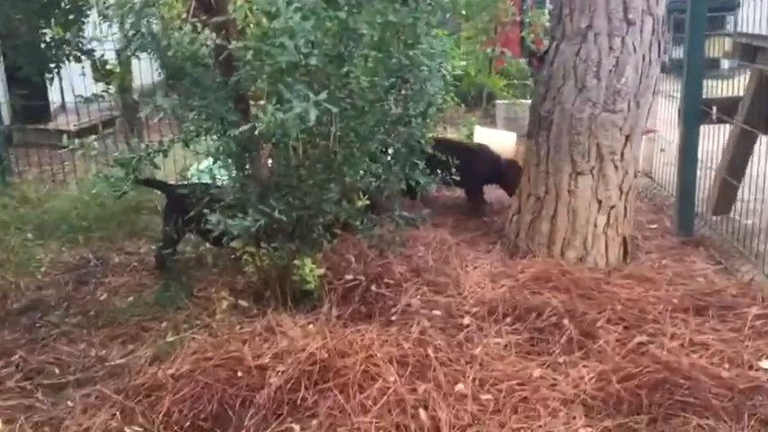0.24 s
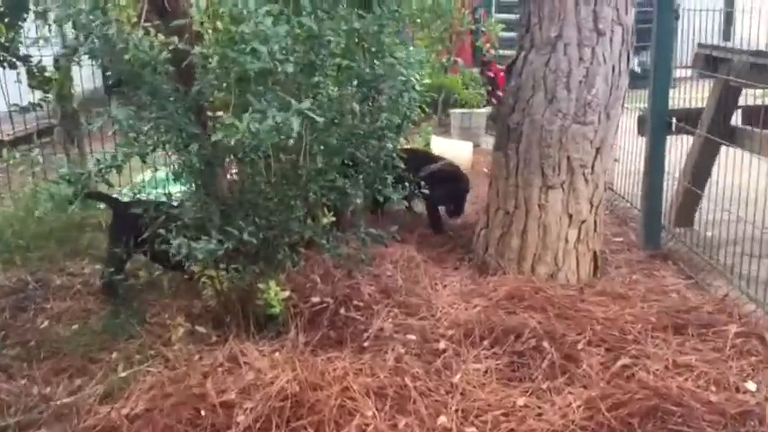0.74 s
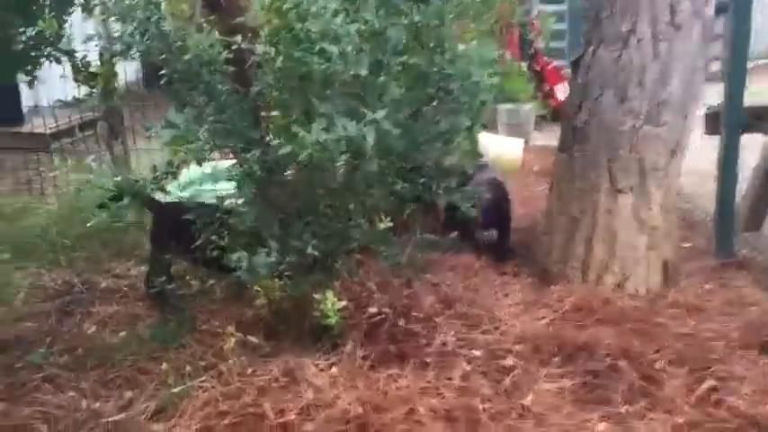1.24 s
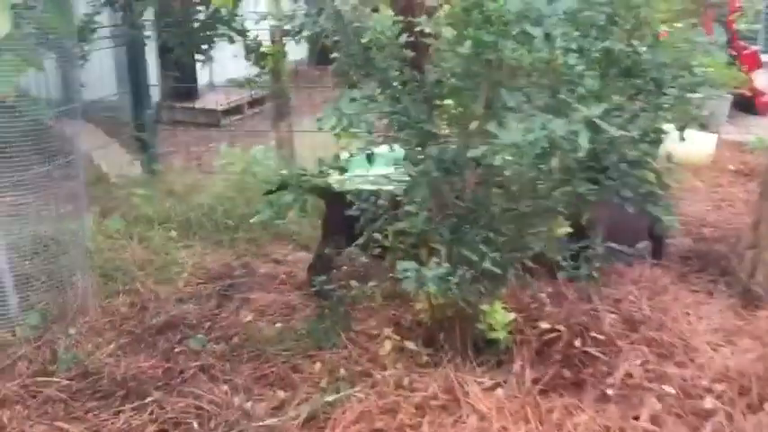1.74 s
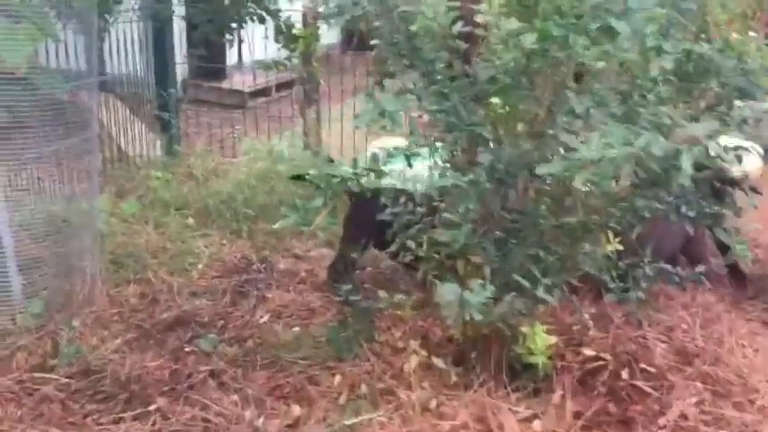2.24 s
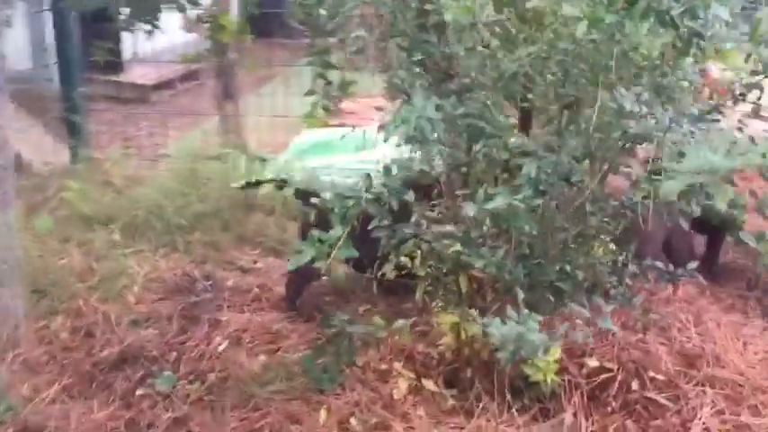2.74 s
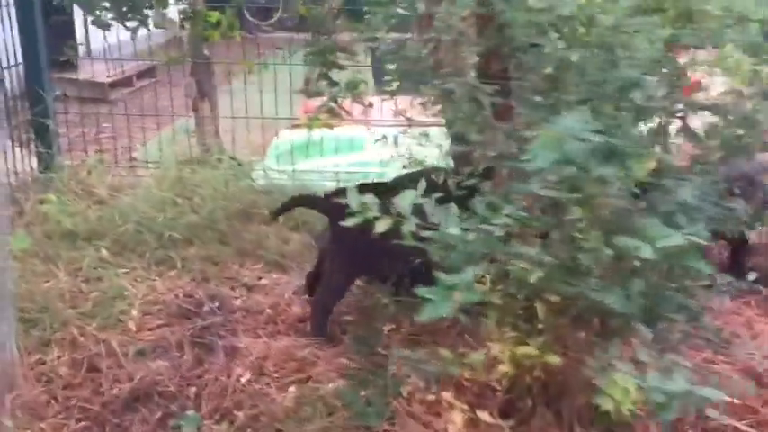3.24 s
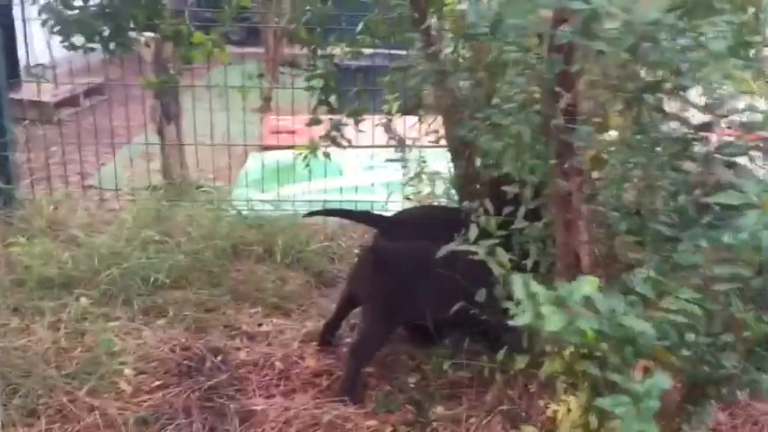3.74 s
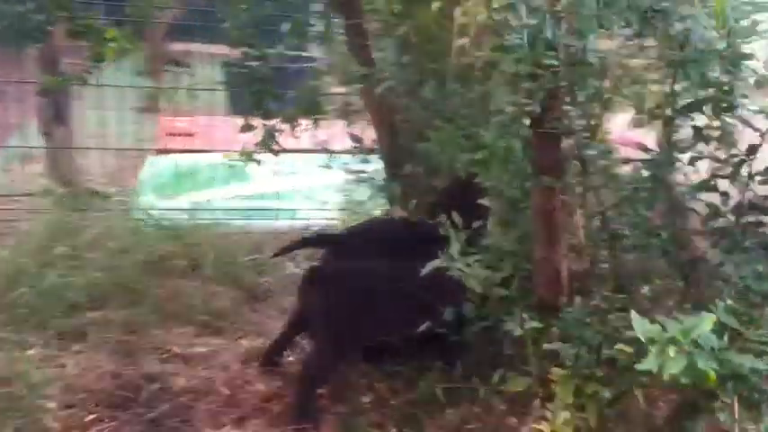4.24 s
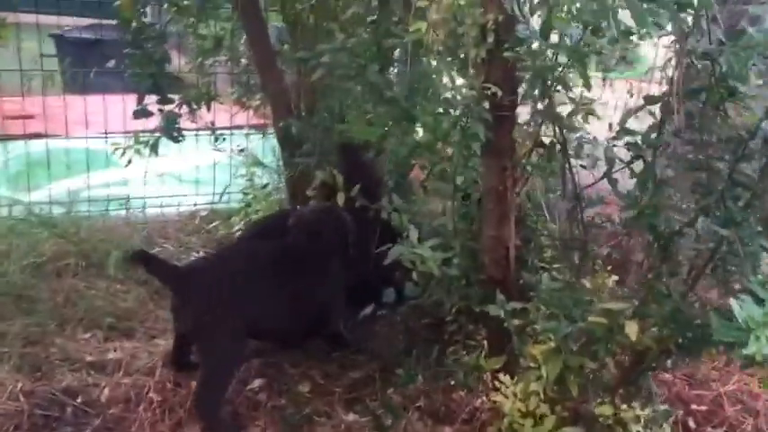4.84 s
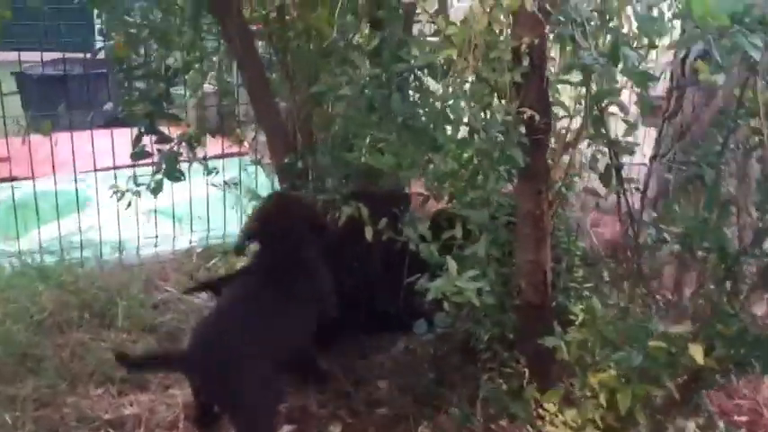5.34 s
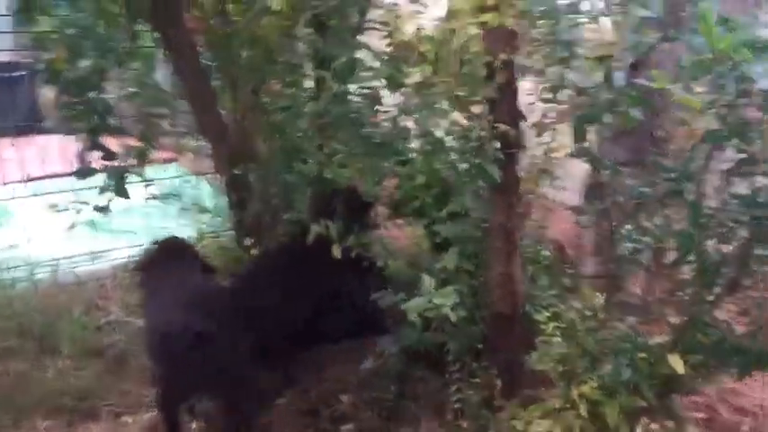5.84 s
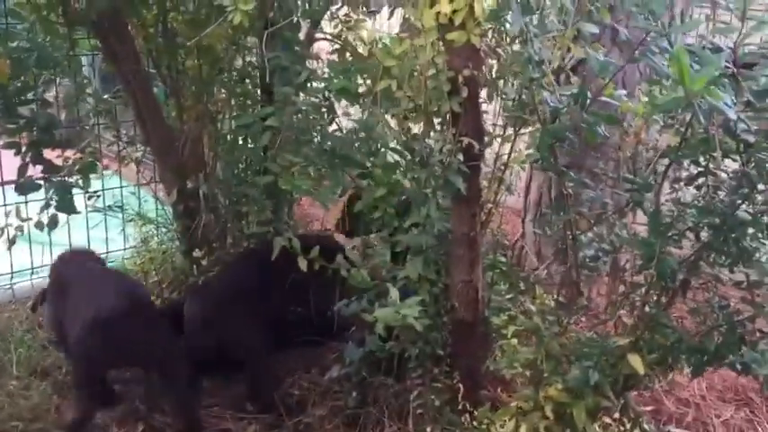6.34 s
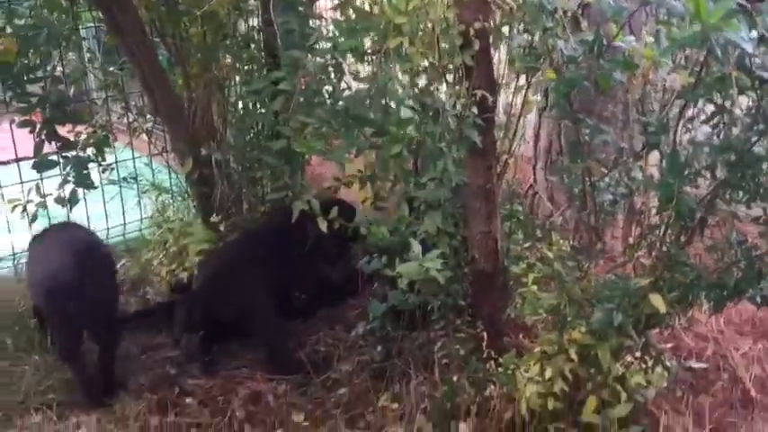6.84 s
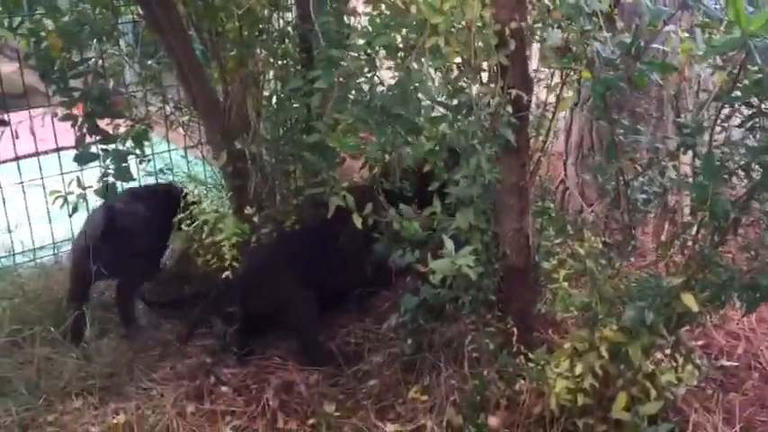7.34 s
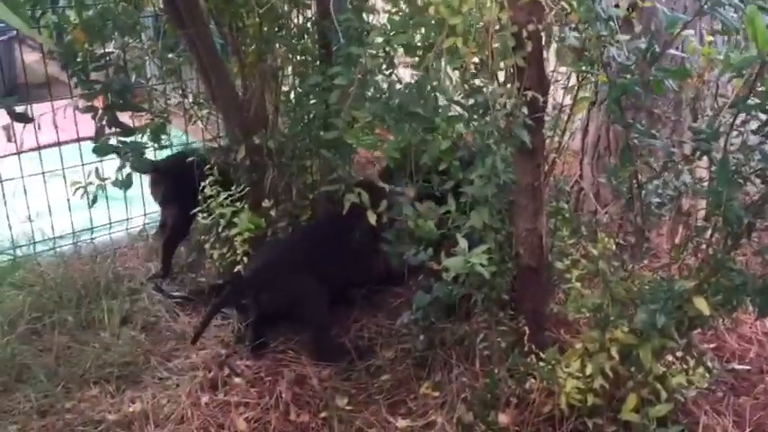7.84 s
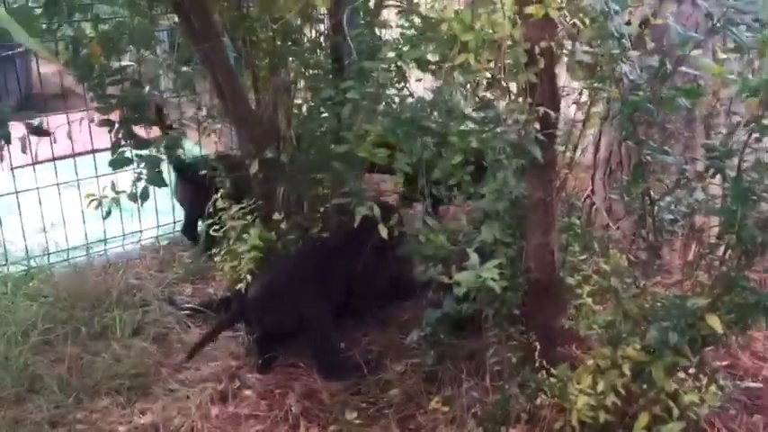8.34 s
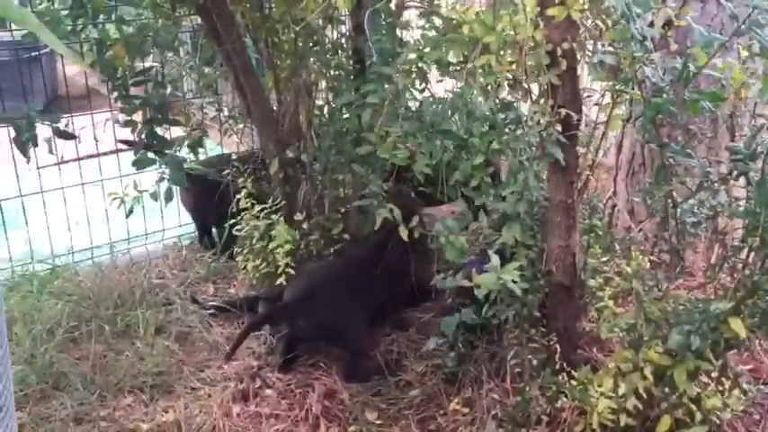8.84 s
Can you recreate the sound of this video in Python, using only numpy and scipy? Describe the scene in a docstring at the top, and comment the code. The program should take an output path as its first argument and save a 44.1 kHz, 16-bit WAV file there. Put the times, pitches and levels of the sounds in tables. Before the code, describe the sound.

Quiet outdoor air with a faint low breeze, heard through a handheld microphone a few metres from puppies scuffling under a shrub. At 0.3 s comes one loud, sharp, high yelp with nasal squeaks, cracking downward and echoing dully. Tiny whimpers and squeaks follow until 1.9 s, the last, around 1.8 s, mixed with a quick leaf rustle. At 2.5 s a sharp needle scuff and knock; near 3 s a very faint hum-like growl. Scuffs, woody taps and small huffs cluster around 3.4-3.9 s. A thin high squeak sounds at 4.5 s, then a burst of hard knocks at 5.1 s and more scuffing to 6 s. Short rough growls come at 6.4-7.1 s and 7.3-7.9 s, amid swelling leaf rustle and low foot thumps. A crisp leaf snap at 8.17 s and a dull knock at 8.25 s lead to quieter stirring until 9 s.

```python
"""Puppies play-fight under a garden shrub, a few metres from a hand-held camera's microphone, in quiet air.
At once one whimpers, squeaks through its nose and yelps: wavering near-pure tones; dull echoes answer.
Bumps, knocks and huffs follow: short decaying tones, struck noise, puffs through muzzle resonances.
From about three seconds come short growls: uneven pulses and breath through moving resonances.
All along, needles scuff and leaves shake as coloured noise; dry leaves snap, and late on one knock thuds."""
import sys
import numpy as np
from scipy import signal
from scipy.fft import rfft, irfft
from scipy.io import wavfile
from scipy.ndimage import uniform_filter1d

SR = 44100
rng = np.random.default_rng(int(sys.argv[2]) if len(sys.argv) > 2 else 0)


def wav_record(signal):
    """Record a signal, one row per channel, as 16-bit PCM in the file named by sys.argv[1]."""
    frames = np.transpose(np.atleast_2d(signal))
    bounded = np.clip(frames, -1, 1)
    # unit amplitude maps onto the largest positive 16-bit level
    quanta = np.round(bounded * 32767).astype(np.int16)
    wavfile.write(sys.argv[1], SR, quanta)


N = 400560  # length in samples


def amp(db):
    """Decibels to gain."""
    return 10 ** (np.asarray(db) / 20)


def unit(x):
    """Scales to an rms of one."""
    return x / np.sqrt(np.mean(x ** 2) + 1e-20)


def read(points, hz):
    """Reads a spectrum on a log-frequency axis."""
    point_hz, value = np.transpose(points)
    return np.interp(np.log(hz + 1), np.log(point_hz + 1), value)


def over_time(points):
    """Reads a curve of (time, value) at every sample of the scene."""
    return np.interp(np.arange(N) / SR, *np.transpose(points))


def follow(rows):
    """Start time and the columns of a curve, sample by sample."""
    s, *columns = np.transpose(rows)
    t = np.arange(s[0], s[-1], 1 / SR)
    return s[0], [np.interp(t, s, column) for column in columns]


def add(mix, s, sound):
    """Lays a sound into the mix at time s."""
    part = mix[max(round(s * SR), 0):][:len(sound)]
    part += sound[:len(part)]


def fade(x, size=130):
    """Softens both ends over a number of samples."""
    i = np.arange(len(x))
    return x * np.minimum(np.minimum(i, i[::-1]) / size, 1)


def drift(count, hz):
    """Smooth random wandering, about one in rms, that moves up to some hz times a second."""
    f = np.fft.rfftfreq(count + SR, 1 / SR)
    slow = rfft(rng.standard_normal(count + SR)) * np.exp(-(f / hz) ** 2)
    return unit(irfft(slow))[:count]


def colour(x, spectrum):
    """Gives a sound a spectrum and an rms of one."""
    gain = amp(read(spectrum, np.fft.rfftfreq(len(x), 1 / SR)))
    return unit(irfft(rfft(x) * gain, len(x)))


def resonate(x, hz, width):
    """A resonance of gain one at its peak."""
    return signal.lfilter(*signal.iirpeak(hz, hz / width, SR), x)


def throat(x, modes):
    """Steep resonances, each passed twice, with dark valleys between them."""
    return sum(amp(db) * resonate(resonate(x, hz, width), hz, width) for hz, width, db in modes)


def moving(x, modes, shift):
    """Steep resonances that all glide by the factor shift."""
    out = 0
    for hz, width, db in modes:
        # bring the resonance down to zero Hz, smooth there, and turn it back up
        turn = np.exp(2j * np.pi * np.cumsum(hz * shift) / SR)
        r = np.exp(-np.pi * width / SR)
        smooth = signal.lfilter([(1 - r) ** 2], np.poly([r, r]), x / turn)
        out = out + amp(db) * 2 * (turn * smooth).real
    return out


def crackle(per_s, spread_db, hiss):
    """Countless tiny clicks of uneven size over a smooth hiss."""
    sizes = amp(spread_db * np.minimum(rng.exponential(1, N), 4)) * rng.standard_normal(N)
    clicks = unit(sizes * (rng.random(N) < per_s / SR))
    return clicks + hiss * rng.standard_normal(N)


def mottle(x, depth_db):
    """Every contact has its own pitch: short patches of the spectrum stand out or sink."""
    z = signal.stft(x, nperseg=512, noverlap=384)[2]
    patches = uniform_filter1d(rng.standard_normal(z.shape), size=4, axis=0)
    patches = unit(uniform_filter1d(patches, size=7, axis=1))
    return signal.istft(z * unit(amp(depth_db * patches)), nperseg=512, noverlap=384)[1][:len(x)]


def swells(rows, range_db=18.5):
    """Gain of overlapping movements that change by range_db over their rise or fall time."""
    t, power = np.arange(0, N, 32) / SR, 0
    for s, db, rise_s, fall_s in rows:
        away = np.maximum((s - t) / rise_s, (t - s) / fall_s)
        power = power + amp(db - range_db * away) ** 2
    return np.interp(np.arange(N) / SR, t, np.sqrt(power))


def arch(length, db, pitches, ends_db, crest):
    """Pitch and level of a short call: one smooth bend through three pitches, one swell.

    Its ends lie ends_db under its crest, which comes at the share crest of its length."""
    u = np.linspace(0, 1, int(length * SR))
    from_crest = np.interp(u, [0, crest, 1], [-1, 0, 1])
    return np.polyval(np.polyfit([0, .5, 1], pitches, 2), u), db - ends_db * from_crest ** 2


def whine(hz, db, tone, jitter, shimmer_db, full_db=-20, purity=.3):
    """A nearly pure call that trembles a little; overtones grow with effort."""
    slack = np.clip((full_db - db) / 20, .2, 1.5)  # soft calls are less steady
    trembling_hz = hz * (1 + slack * jitter * drift(len(hz), 300))
    angle = 2 * np.pi * np.cumsum(trembling_hz) / SR
    overtones = sum(amp(part_db) * np.sin(round(k) * angle) for k, part_db in tone[1:])
    wave = amp(tone[0][1]) * np.sin(angle) + overtones * amp(purity * (db - full_db))
    return fade(np.sqrt(2) * wave * amp(db + slack * shimmer_db * drift(len(hz), 90)))


def air(wash_db=-64, breeze_db=-70, gust_db=2.5):
    """Quiet outdoor wash and a lumpy breeze on the microphone: coloured noise that swells together."""
    # spectrum of the wash: freq_hz, relative level_db
    wash_spectrum = [(18, -28.5), (30, -5.5), (59, 8), (85, 5.5), (182, -7), (341, -14), (1510, -11),
                     (1910, -13.5), (4310, -17), (4910, -20), (6050, -18.5), (11300, -28), (15500, -23)]
    # slow swells of the whole: time_s, gain_db
    wash_swell = [(0, -2), (.5, 0.5), (0.798, 2.5), (2.4, 0), (4.2, 1.5), (6.2, -1), (9.08, 0.5)]
    wash = colour(rng.standard_normal(N), wash_spectrum) * amp(wash_db + 1.2 * drift(N, 6))
    breeze = unit(throat(rng.standard_normal(N), [(71, 310, -2.5), (135, 89, -8)]))
    outdoors = wash + breeze * amp(breeze_db + gust_db * drift(N, 13.7))
    return outdoors * amp(over_time(wash_swell))


def leaves(gain_db=-1, clump_db=2.0, tick_db=-9):
    """Leaves brush each other as the shrub shakes, with a sprinkle of drier ticks."""
    # pushes that shake the shrub: peak_time_s, level_db before gain_db, rise_s, fall_s
    pushes = [(.98, -64.5, .12, 0.11), (1.19, -60, .15, .1), (1.39, -61.5, .1, .25),
              (1.76, -54.5, 0.14, 0.16), (1.83, -48.5, 0.032, 0.033), (3.44, -50.5, 0.064, 0.097),
              (4.32, -53, 0.13, 0.087), (4.97, -55.5, 0.071, 0.11), (5.39, -61, 0.45, 0.084),
              (6.03, -52, 0.33, .09), (6.43, -55.5, 0.13, 0.082), (6.67, -55, 0.13, 0.2),
              (7.27, -47.5, 0.12, 0.061), (7.58, -51, 0.27, 0.24), (7.73, -53.5, 0.082, .2),
              (8.11, -50, 0.16, 0.12), (8.172, -46, 0.036, 0.092), (8.98, -61, 0.21, 0.31)]
    # leaves stirring between pushes: time_s, level_db before gain_db
    stirring = [(0, -75.5), (2.5, -72.5), (4.6, -65), (6.5, -68.5), (9.08, -67.5)]
    # spectrum of the leaves: freq_hz, relative level_db
    leaf_spectrum = [(880, -24.5), (1500, -15.5), (2440, -6), (3280, -5), (4390, -3), (5040, -5),
                     (8710, -1), (10500, -4.5), (11700, -1.5), (15500, -8)]
    shake = np.hypot(swells(pushes), amp(over_time(stirring)))
    brush = rng.standard_normal(N) * amp(clump_db * drift(N, 36))
    ticks = amp(tick_db) * crackle(per_s=200, spread_db=3, hiss=0)
    return amp(gain_db) * shake * colour(brush + ticks, leaf_spectrum)


def scuffs(clump_db=0.5, shuffle_db=-69, restless_db=4):
    """Paws drag through needles: clumps of small clicks under each stroke, over a restless shuffle."""
    # paw strokes through the pine needles: peak_time_s, peak_db, rise_s, fall_s
    strokes = [(2.536, -42, 0.031, 0.054), (3.42, -56, .03, .15), (3.535, -53.5, 0.18, 0.02),
               (3.77, -60.5, .03, 0.025), (3.91, -67, 0.071, 0.0088), (4.37, -60.5, 0.23, 0.033),
               (5.092, -48.5, 0.094, .095), (5.49, -63, .08, 0.017), (5.66, -62, 0.14, 0.41),
               (5.862, -55, 0.055, .03), (5.955, -50.5, 0.053, 0.09)]
    # spectrum of the needles: freq_hz, relative level_db
    needle_spectrum = [(120, -25.5), (200, -1.5), (467, -6.5), (647, -4), (761, -8), (896, -1.5),
                       (1540, -7), (3010, -12.5), (3800, -10.5), (4810, -20), (5760, -12.5), (15000, -40.5)]
    # the small steps grow audible as the camera comes nearer, then sink again
    nearness = np.interp(np.arange(N) / SR, [0, 3.5, 8, 9], [0.34, 1, 0.51, 0.15])
    shuffle = nearness * amp(shuffle_db + restless_db * drift(N, 3.9))
    grains = crackle(per_s=1600, spread_db=3, hiss=.4) * amp(clump_db * drift(N, 70))
    return (swells(strokes) + shuffle) * colour(grains, needle_spectrum)


def cries():
    """The yelp, the whimpers, and the cracks in which the voice drops to a lower register, with leaking air."""
    # the one loud yelp: time_s, pitch_hz, level_db
    yelp = [(.325, 1380, -46), (.330, 1475, -21.5), (.336, 1500, -19), (.352, 1518, -19.3),
            (.359, 1555, -21.5), (.369, 1562, -19.7), (.385, 1540, -35)]
    # soft whimpers: start_s, length_s, peak_db, first_hz, middle_hz, last_hz
    whimpers = [(.283, .021, -33, 1328, 1346, 1400), (0.593, 0.029, -58.5, 740, 712, 700),
                (1.035, 0.069, -56.5, 632, 654, 710), (1.304, 0.041, -50, 1375, 1432, 1410),
                (1.387, 0.077, -58.5, 755, 780, 664), (1.715, 0.096, -50.5, 970, 1072, 1070),
                (1.801, 0.096, -44.5, 1103, 1177, 1030)]
    # a strained cry cracks into a lower register: start_s, peak_db, pitch_hz that it sinks towards
    cracks = [(0.386, -38.5, 997), (1.792, -48.5, 607), (1.884, -49.5, 795)]
    # voice at full effort: harmonic number, level_db
    cry_tone = [(1, -0.5), (2, -25.5), (3, -33.5), (4, -26.5), (5, -54)]
    # air that escapes with a cry: freq_hz, width_hz of each pass, level_db against the voice
    escaping_air = [(3600, 1500, -42), (5600, 780, -40.5)]
    crack_s, crack_fade_db = 0.034, 14.5
    out, t = np.zeros(N), np.arange(0, crack_s, 1 / SR)
    calls = [follow(yelp)]
    for s, length, peak_db, *pitches in whimpers:
        calls.append((s, arch(length, peak_db, pitches, ends_db=9.5, crest=0.61)))
    for s, peak_db, low_hz in cracks:
        sinking_hz = low_hz * (1 + 0.59 * np.exp(-t / 0.0049))  # starts higher by this share
        calls.append((s, (sinking_hz, peak_db - crack_fade_db * t / crack_s)))
    for s, (hz, db) in calls:
        rush = rng.standard_normal(len(hz))
        leak = sum(amp(air_db) * unit(throat(rush, [(air_hz, width, 0)]))
                   for air_hz, width, air_db in escaping_air)
        voice = whine(hz, db, cry_tone, jitter=0.012, shimmer_db=1.9)
        add(out, s, voice + fade(leak * amp(db)))
    return out


def squeaks():
    """High whistles through the nose, each with some of its octave."""
    # squeaks: start_s, length_s, peak_db, first_hz, middle_hz, last_hz, octave_db at full effort
    squeak_rows = [(.306, 0.034, -48.5, 5360, 5280, 5650, -2.5),
                   (0.382, 0.024, -50.5, 5820, 5810, 5850, -7.5),
                   (0.629, 0.075, -49.5, 6520, 5640, 5400, 2.5), (1.205, 0.039, -62, 4800, 4825, 4860, -12),
                   (1.305, 0.033, -61, 5600, 5580, 5700, -18), (1.342, 0.028, -52.5, 6020, 5860, 5900, -6),
                   (1.352, 0.1, -59.5, 5660, 6000, 7250, -12), (4.453, 0.042, -56, 4900, 4960, 5170, -20),
                   (4.492, 0.079, -43.5, 5130, 5250, 5150, -18)]
    out = np.zeros(N)
    for s, length, peak_db, *pitches, octave_db in squeak_rows:
        hz, db = arch(length, peak_db, pitches, ends_db=10, crest=0.59)
        add(out, s, whine(hz, db, [(1, 0), (2, octave_db)], jitter=0.0014, shimmer_db=1.46))
    return out


def bumps(gain_db=1):
    """Soft ground gives way for a few cycles under a foot: a low tone that swells and dies."""
    # feet on the ground: start_s, level_db before gain_db, pitch_hz, swell_s
    bump_rows = [(0.659, -46, 54, 0.0083), (0.857, -50.5, 127, 0.006), (2.54, -60, 97.8, 0.0086),
                 (3.417, -47.5, 87, .007), (3.877, -52, 126, 0.0097), (5.089, -42.5, 302, 0.0026),
                 (5.565, -48.5, 106.6, 0.0061), (7.504, -34.5, 70.3, 0.005), (7.652, -41, 84.6, 0.013),
                 (7.762, -38, 111, 0.01), (7.806, -36.5, 73, 0.016), (8.029, -35.5, 62.4, 0.014),
                 (8.25, -42, 126, 0.0047), (8.737, -42.5, 58.4, 0.0054)]
    out, t = np.zeros(N), np.arange(9000) / SR
    for s, db, hz, swell_s in bump_rows:
        swell = t / swell_s * np.exp(1 - t / swell_s)
        add(out, s, amp(gain_db + db) * np.sin(2 * np.pi * hz * t) * swell)
    return out


def knocks(gain_db=-3, ring_db=2, clatter_db=-4, crack_db=-1,
           ring_s=0.0048, crack_s=0.002, clatter_s=0.005, thud_s=0.0089):
    """A blow cracks, rings the wood briefly, rattles the litter and pushes the ground."""
    # paws and bodies on stems and twigs: start_s, level_db before gain_db, ring_hz,
    # extra crack_db, thud_db
    blows = [(0.761, -43, 1860, -14, -1), (1.117, -43, 2100, -21, -21), (2.534, -36, 2045, -23, 5.5),
             (2.542, -38, 1570, -19, 0), (2.594, -38, 1400, -32, 0), (2.717, -55.5, 346, 5, 16),
             (2.765, -44, 494, -3, 3), (3.067, -49.5, 1220, -14, 4), (3.396, -41.5, 1500, -17, -7),
             (3.489, -39, 1550, -3, -3), (3.52, -43, 1460, -16, 2.5), (3.532, -39.5, 1160, 3, -13),
             (3.644, -46, 307, -9, -5), (5.082, -38, 2040, 8, -30), (5.085, -31, 1183, -3, -14),
             (5.109, -27, 1330, -3, -34), (5.126, -37, 1160, -13, -11), (5.393, -41, 410, -26, -4),
             (5.432, -45, 1275, -25, -4), (5.445, -42.5, 810, -28, -3), (5.645, -37, 940, -2, -29),
             (5.866, -37, 610, -24, -29), (5.909, -43.5, 2300, 4.5, -23), (5.945, -41, 297, -5, -5),
             (5.964, -40.5, 293, -12, 1), (5.994, -40.5, 315, -12, 3.5), (6.487, -46.5, 1170, -22, -19),
             (7.438, -33.5, 384, -10, 7), (8.356, -44, 1080, -2, -30), (8.371, -51, 1430, 3, -30),
             (8.624, -53, 957, -24, -20)]
    crack_modes = [(2160, 1300, 6.0), (3800, 560, 12.5), (6300, 1000, -1.5)]  # Hz, width Hz, dB
    out, t = np.zeros(N), np.arange(6000) / SR
    for s, db, hz, hard_db, heavy_db in blows:
        litter_noise, crack_noise = rng.standard_normal((2, len(t)))
        ring = np.sin(2 * np.pi * hz * t) * np.exp(-t / ring_s)
        clatter = unit(throat(litter_noise, [(hz, 1.2 * hz, 0)])) * np.exp(-t / clatter_s)
        crack = unit(throat(crack_noise, crack_modes)) * np.exp(-t / crack_s)
        thud = np.sin(2 * np.pi * rng.uniform(82.5, 210) * t) * np.exp(-t / thud_s)
        blow = amp(ring_db) * ring + amp(clatter_db) * clatter
        blow += amp(crack_db + hard_db) * crack + amp(heavy_db) * thud
        add(out, s, amp(gain_db + db) * blow)
    return out


def huffs(gain_db=2, flutter_db=2.2, wobble=.05):
    """Puppies huff into each other's fur: short fluttering puffs of air through muzzle and nose."""
    # puffs: start_s, length_s, level_db before gain_db, muzzle_hz, nose hiss_db against the muzzle
    puffs = [(0.792, 0.081, -61, 860, -6), (1.479, 0.075, -57, 930, -11.5), (2.035, 0.056, -50, 985, -37),
             (2.132, 0.07, -56, 1150, -22), (2.182, 0.081, -57, 1395, -11), (3.155, 0.071, -55, 1340, -3),
             (3.382, 0.076, -52.5, 1550, 1), (4.354, 0.055, -57, 1170, -14),
             (4.69, 0.053, -55.5, 1380, -5.5), (5.169, 0.068, -54.5, 1200, -21),
             (5.581, 0.1, -63, 910, -0.5), (6.482, 0.041, -58.5, 1390, -10),
             (6.593, 0.064, -56.5, 1430, -22), (7.112, 0.044, -62, 1700, -7),
             (7.848, 0.065, -58, 1970, -10.5), (7.963, 0.098, -56, 1680, -15)]
    # muzzle resonances: multiple of muzzle_hz, width_hz of each pass, relative level_db
    muzzle_modes = [(.68, 318, 12.5), (1, 390, 17.5), (1.3, 354, 8)]
    # nose resonances: freq_hz, width_hz of each pass, relative level_db
    nose_modes = [(3090, 2100, 8.5), (3870, 1000, 7), (6250, 710, 7.5)]
    out = np.zeros(N)
    for s, length, db, hz, hiss_db in puffs:
        n = int(length * SR)
        flow = rng.standard_normal(n) * amp(flutter_db * drift(n, 56))
        shift = 1 + wobble * drift(n, 8.6)
        muzzle = moving(flow, [(k * hz, width, mode_db) for k, width, mode_db in muzzle_modes], shift)
        puff = unit(muzzle) + amp(hiss_db) * unit(moving(flow, nose_modes, shift))
        add(out, s, amp(gain_db + db) * puff * np.sin(np.linspace(0, np.pi, n)))
    return out


def growl_gesture(length, swell_s, peak_db, fade_db, first_hz, last_hz, rough, jaw_db, teeth_db):
    """One push of breath: it starts, swells and fades while the pitch glides and the jaw opens and sinks."""
    onset_s, release_s, silent_db = .022, 0.027, 20.5  # the voice starts and stops from this far down
    jaw_open_s, jaw_shut_db, jaw_close_db = 0.032, 10, 4
    calm_ends = .5  # share of the roughness left as the voice starts and stops
    t = np.arange(0, length, 1 / SR)
    voiced = np.clip(np.minimum(t / onset_s, (length - t) / release_s), 0, 1)
    growing = np.clip(1 - t / swell_s, 0, 1)
    spent = np.clip((t - swell_s) / (length - swell_s), 0, 1)
    db = peak_db - silent_db * (1 - voiced) - 5.5 * growing - fade_db * spent
    mouth_db = -jaw_shut_db * np.clip(1 - t / jaw_open_s, 0, 1) - jaw_close_db * spent
    hz = first_hz + (last_hz - first_hz) * t / length
    return hz, db, rough * (calm_ends + (1 - calm_ends) * voiced), jaw_db + mouth_db, teeth_db


def growls(jitter=.32, flutter_db=5.5, breath=.7, wobble=.045, smear=.7, smear_s=.004):
    """Slack folds slap unevenly and let through puffs of air; jaw and lips open the upper resonances."""
    # bouts: start_s, length_s, swell_s, peak_db, fade_db, first_hz, last_hz, roughness (0-1),
    # open jaw_db, bared teeth_db
    bouts = [(2.989, 0.16, .02, -61.5, 2, 229.6, 170.4, 0.03, -18, -14),
             (6.37, .115, 0.022, -48.5, 11, 166.5, 142.3, 0.16, -32, -20),
             (6.639, .185, 0.074, -32.5, 4.5, 215, 189, .66, 2.2, -1),
             (6.795, .275, 0.11, -36.5, 13.5, 173.5, 156, .58, -4, -26),
             (7.333, .225, 0.068, -35.5, 16.5, 203.7, 150.4, .52, 0.3, 9),
             (7.685, 0.14, 0.062, -39, 22, 188.8, 151.4, 0.62, -1.5, 6),
             (7.8, 0.093, .03, -49.5, 2.5, 138.4, 140, .6, -1, 0)]
    # resonances, by what opens them: freq_hz, width_hz of each pass, relative level_db
    chest_modes = [(162, 113, 9.5), (388, 55, 3.5)]
    jaw_modes = [(728, 44, 4.5), (918, 93, 0)]
    teeth_modes = [(1270, 170, -30), (1510, 400, -12), (1890, 230, -14.5)]
    # brighter resonances of a wide-open mouth, same columns
    bright_modes = [(2040, 49, -11), (3060, 250, -19.5), (4030, 420, -34)]
    # air rushing through an open mouth, same columns
    rasp_modes = [(2870, 1500, -24), (3820, 640, -32)]
    out = np.zeros(N)
    for s, *gesture in bouts:
        hz, db, rough, jaw_db, teeth_db = growl_gesture(*gesture)
        n = len(hz)
        turns = np.cumsum(hz * (1 + jitter * rough * drift(n, 110))) / SR
        slaps = unit(np.diff(np.floor(turns), prepend=0))  # one pulse a turn
        puffs = unit((0.31 + np.exp(-(turns % 1))) * rng.standard_normal(n))
        drive = (slaps + breath * rough * puffs) * amp(flutter_db * rough * drift(n, 130))
        # a gentle growl is a closed-mouth hum with little but its fundamental
        hum = throat(drive, chest_modes[:1])
        chest = hum + np.minimum(2 * rough, 1) * throat(drive, chest_modes[1:])
        # the mouth keeps changing shape as the puppy bites and tugs
        shift = 1 + wobble * drift(n, 31)
        edge = amp(2.6 * jaw_db) * (moving(drive, bright_modes, shift) + moving(puffs, rasp_modes, shift))
        edge += amp(teeth_db) * moving(drive, teeth_modes, shift)
        # stems and leaves scatter the short waves
        scatter = rng.standard_normal(900) * np.exp(-np.arange(900) / SR / smear_s)
        scattered = signal.fftconvolve(edge, scatter / np.linalg.norm(scatter))[:n]
        edge = (edge + smear * scattered) / np.hypot(1, smear)
        voice = chest + amp(jaw_db) * moving(drive, jaw_modes, shift) + edge
        # the chest sound is held level, so that db alone sets its loudness
        strength = np.sqrt(np.abs(uniform_filter1d(chest ** 2, size=1300)) + 1e-9)
        add(out, s, fade(voice / strength * amp(db)))
    return out


def snaps(decay_s=.0018):
    """Single dry leaves crack with a bright tick of decaying, resonant noise."""
    # ticks: start_s, level_db, freq_hz
    ticks = [(3.7675, -46.5, 7260), (4.5098, -42.5, 9200), (4.7527, -50, 12440), (7.477, -44, 12570),
             (8.166, -39, 6800), (8.1721, -32, 7450)]
    out, t = np.zeros(N), np.arange(900) / SR
    for s, db, hz in ticks:
        tick = unit(resonate(rng.standard_normal(len(t)), hz, 2300))
        add(out, s, amp(db) * tick * np.exp(-t / decay_s))
    return out


def thock(s=8.2535, level_db=-33, top_hz=1150, end_hz=110, fall_s=0.0043, decay_s=0.0041):
    """One dull, close knock whose pitch drops at once into a thud."""
    out, t = np.zeros(N), np.arange(3000) / SR
    hz = end_hz + (top_hz - end_hz) * np.exp(-t / fall_s)
    knock = np.sin(2 * np.pi * np.cumsum(hz) / SR) * np.exp(-t / decay_s)
    add(out, s, amp(level_db) * fade(knock, size=30))
    return out


def garden(x, tail_db=-26, blur_db=-9, dull_hz=2600):
    """A few dull, blurred echoes off the walls and a thin tail scattered by trees."""
    # echoes off fence and walls: delay_s, level_db before dulling
    echo_rows = [(.064, -16), (.113, -31.5), (.163, -31)]
    # decay of the tail: freq_hz, time to fall 60 dB_s
    tail_decay = [(100, .3), (1500, 0.79), (3500, .3), (15000, 0.3)]
    hz, t, z = signal.stft(rng.standard_normal(SR), SR, nperseg=256)
    tail = signal.istft(z * amp(-60 * t / read(tail_decay, hz)[:, None]), SR, nperseg=256)[1]
    echoes = np.zeros(len(tail))
    for delay, db in echo_rows:
        blur = rng.standard_normal(400) * np.linspace(1, 0, 400)
        add(echoes, delay, amp(db + blur_db) * blur / np.linalg.norm(blur))
        add(echoes, delay, amp([db]))
    echoes = signal.lfilter(*signal.butter(1, dull_hz, fs=SR), echoes)
    return signal.fftconvolve(x, echoes + amp(tail_db) * tail / np.linalg.norm(tail))[:N]


def scene(growl_room_db=-7, scuffle_room_db=-1):
    """Puppies and shrub in the open garden; voices and scuffle also reach the walls."""
    crying, squeaking, growling = cries(), squeaks(), growls()
    scuffle = mottle(scuffs(), depth_db=3.8) + huffs() + knocks() + snaps()
    room = garden(crying + squeaking + amp(growl_room_db) * growling + amp(scuffle_room_db) * scuffle)
    puppies = crying + squeaking + growling + scuffle + room
    shrub = mottle(leaves(), depth_db=2.5)
    return (puppies + shrub + bumps() + thock() + air())[None]


def record(dry, low_hz=40, edge_hz=15780):
    """The microphone's bass cut and the recorder's band limit."""
    thin = signal.sosfilt(signal.butter(N=3, Wn=low_hz, btype="high", fs=SR, output="sos"), dry)
    band_limit = signal.firwin(701, edge_hz, window=("kaiser", 9), fs=SR)
    return signal.oaconvolve(thin, band_limit[None], "same")


dry = scene()
out = record(dry)
wav_record(out)
```